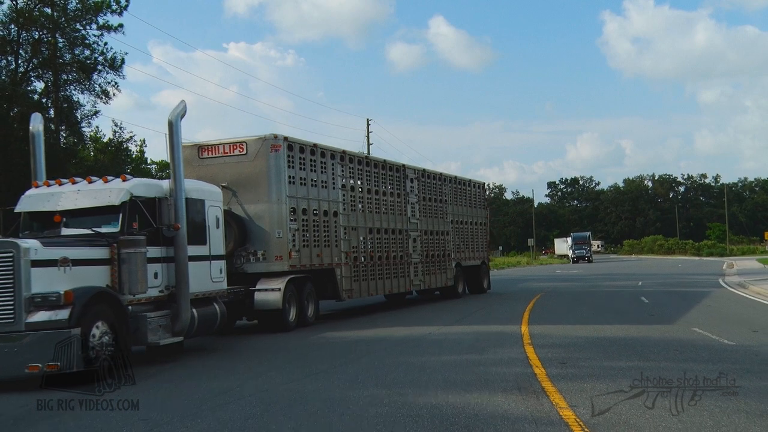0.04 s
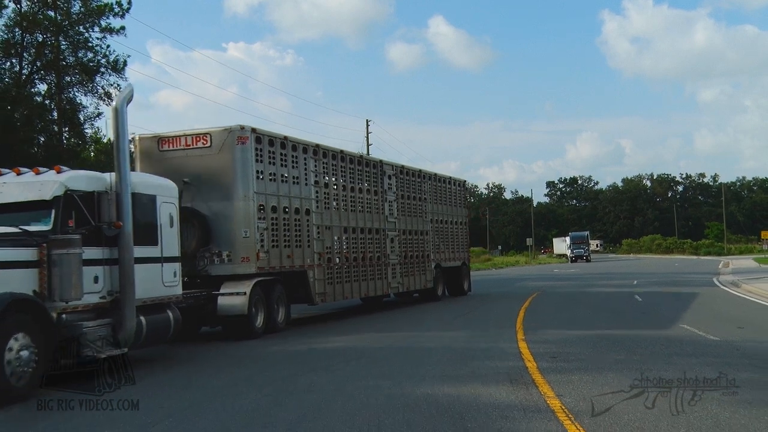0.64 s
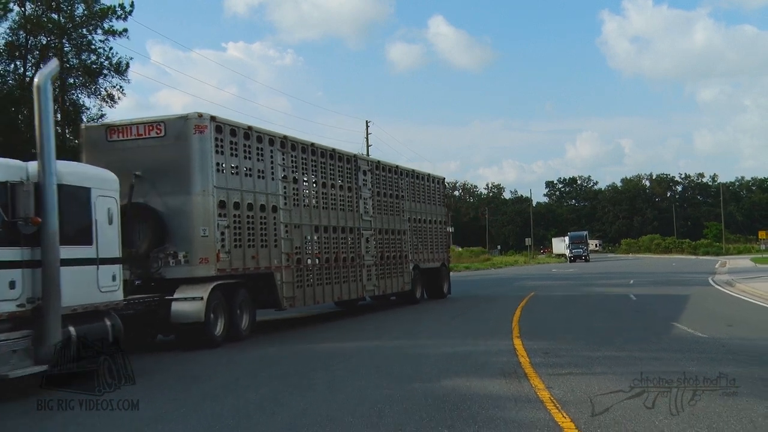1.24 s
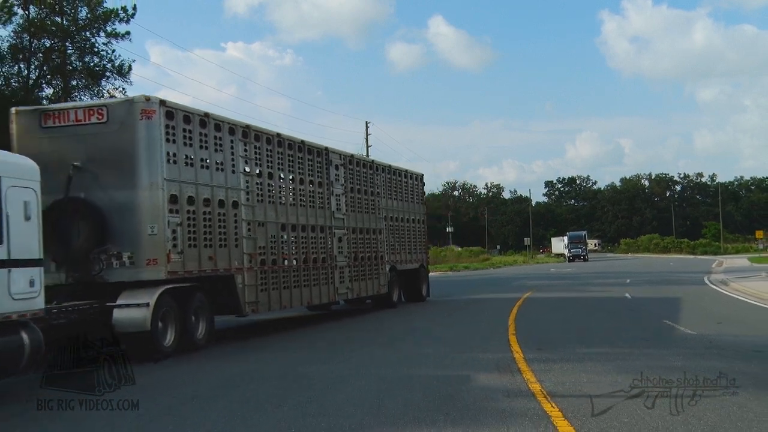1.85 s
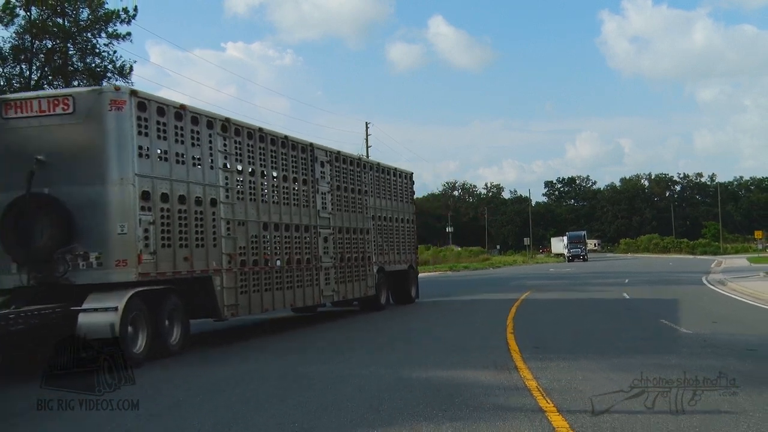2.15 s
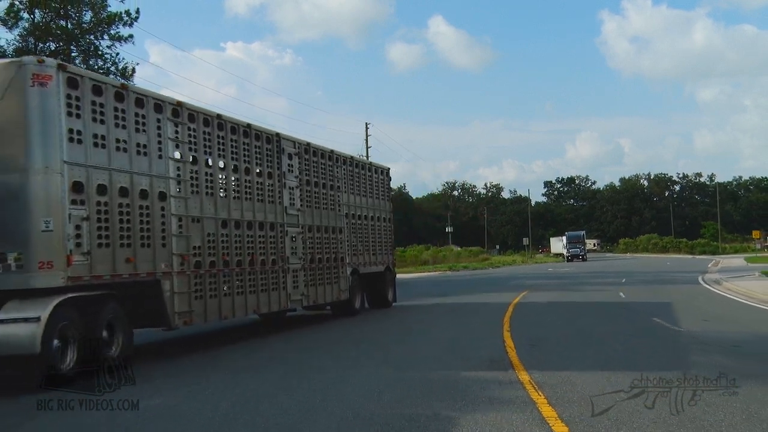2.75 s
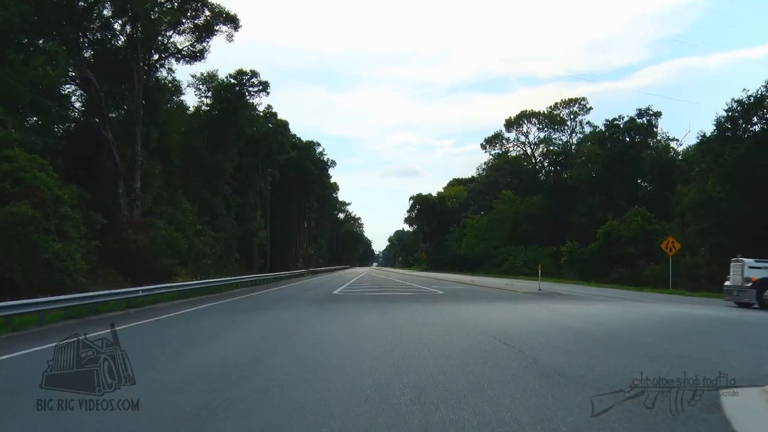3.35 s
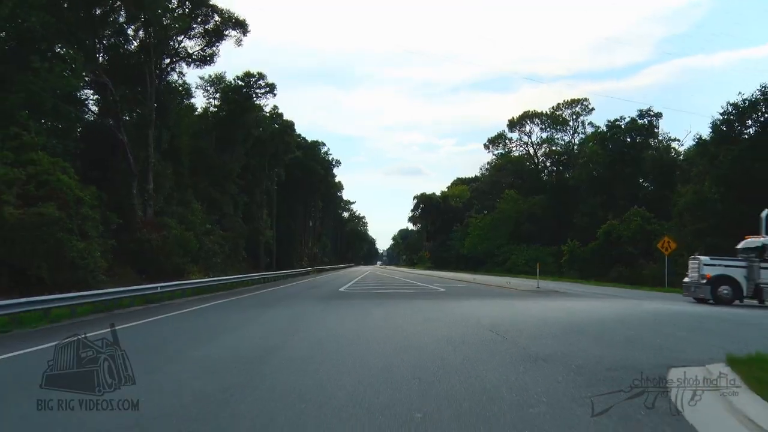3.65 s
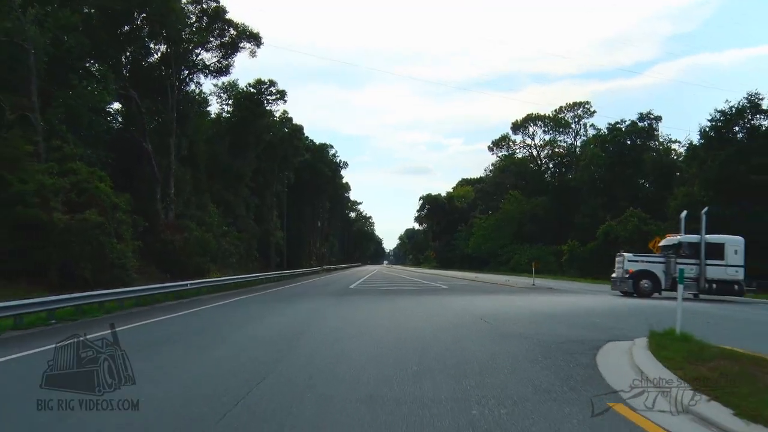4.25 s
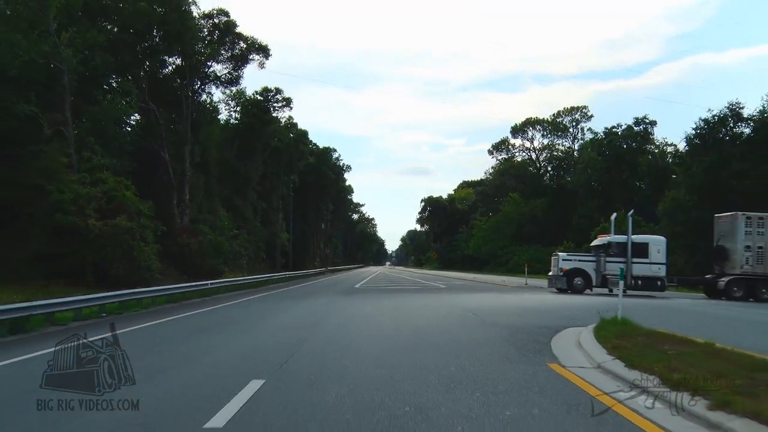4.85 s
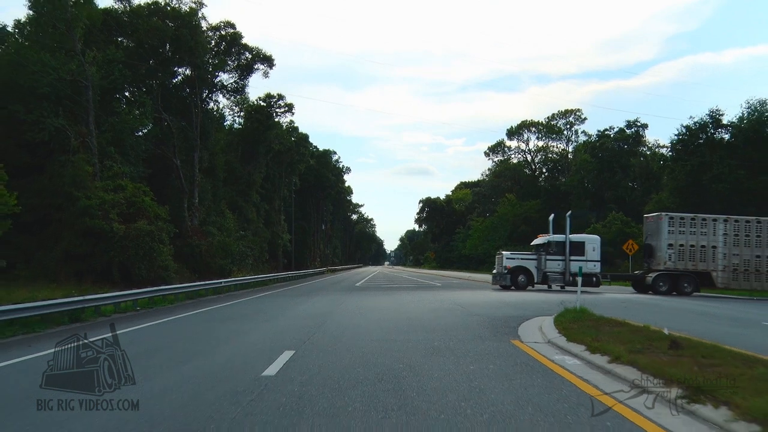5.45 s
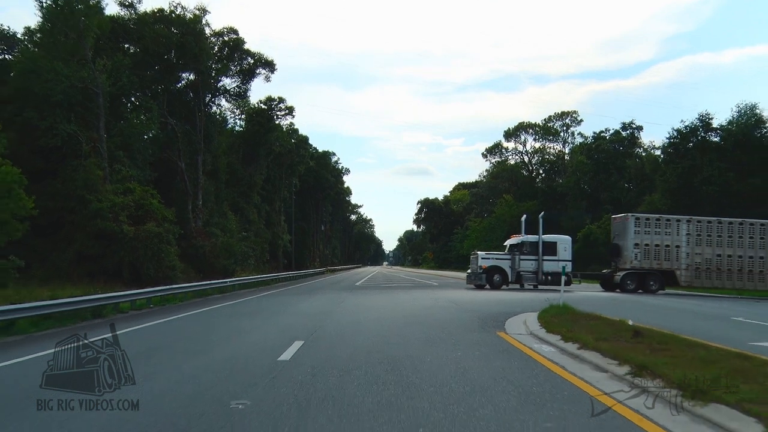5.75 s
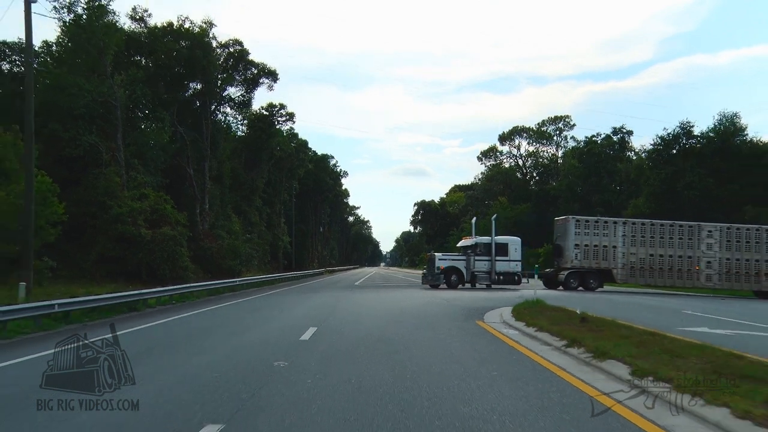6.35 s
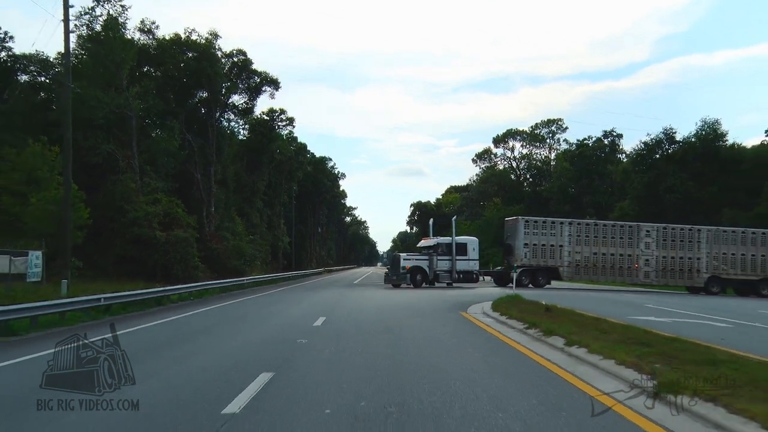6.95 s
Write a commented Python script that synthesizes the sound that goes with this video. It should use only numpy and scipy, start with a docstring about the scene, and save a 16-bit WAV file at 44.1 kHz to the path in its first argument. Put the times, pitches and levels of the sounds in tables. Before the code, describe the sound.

Close beside a road, a big diesel rig rolls by at walking pace, its exhaust booming, its turbo hissing and its belt chirping above a low rumble. Several hollow knocks pass with it. Then the truck is heard from a distance, quieter, turning onto a highway with slowly rising revs. Another diesel revs up, and faint brake squeals and short puffs of air sound over the continuing drone.

```python
"""A six-cylinder diesel truck pulls a livestock trailer past at walking pace: its firings roar and
clatter, the stacks boom, the turbo hisses and the belt chirps over a deep drone. Near 3 s dull knocks
pass with the cab. Around 4 s the scene dissolves to the same truck farther off, turning onto a highway.
A second engine revs up; then come thin brake squeals and short puffs of brake air,
while the truck slowly gains revs."""
import sys
import numpy as np
from scipy.fft import rfft, irfft, next_fast_len
from scipy.io import wavfile
from scipy.ndimage import uniform_filter1d, map_coordinates

SR = 44100
rng = np.random.default_rng(int(sys.argv[2]) if len(sys.argv) > 2 else 0)


def dump(signal):
    """Clip the signal to [-1, 1] and save it as 16-bit WAV at the path in sys.argv[1]."""
    limited = np.clip(np.atleast_2d(signal).T, -1, 1)
    pcm = np.round(limited * 32767).astype(np.int16)
    wavfile.write(sys.argv[1], SR, pcm)


N = 317520
TIME = np.arange(N) / SR
DISSOLVE_S = (3.696, 4.24)  # the close pass fades into the distant view


def amp(db):
    """Amplitude ratio of a level in decibels."""
    return 10 ** (np.asarray(db) / 20)


def unit(x):
    """Normalisation to rms 1."""
    return x / np.sqrt(np.mean(x ** 2) + 1e-20)


def along(points, hz):
    """Gain interpolated between (f/Hz, level/dB) points on a logarithmic frequency axis."""
    f, db = np.transpose(points)
    return amp(np.interp(np.log(hz + 1), np.log(f + 1), db))


def curve(points):
    """Linear interpolation of (t/s, value) points at every sample."""
    return np.interp(TIME, *np.transpose(points))


def bell(offset, sigma):
    """Gaussian window, 1 at offset 0."""
    return np.exp(-(offset / sigma) ** 2 / 2)


def wobble(rate):
    """Random modulation: a smooth curve with rate knots a second."""
    return map_coordinates(rng.standard_normal(int(N * rate / SR) + 4), [TIME * rate])


def filtered(x, response):
    """Linear filtering: the spectrum of x times a frequency response."""
    size = next_fast_len(N + SR // 2)
    return irfft(rfft(x, size) * response(np.fft.rfftfreq(size, 1 / SR)), size)[:N]


def noise(spectrum):
    """Coloured noise of rms 1, shaped by (f/Hz, level/dB) points."""
    return unit(filtered(rng.standard_normal(N), lambda hz: along(spectrum, hz)))


def narrow(hz, width_hz):
    """Narrow-band noise of rms 1: one randomly excited resonance."""
    return unit(filtered(rng.standard_normal(N), lambda f: np.exp(-((f - hz) / width_hz) ** 2)))


def tone(turns):
    """Sinusoid of rms 1 with a random starting phase."""
    return np.sqrt(2) * np.sin(2 * np.pi * (turns + rng.random()))


def afar():
    """Linear crossfade: 0 beside the road, 1 in the distant view."""
    return np.interp(TIME, DISSOLVE_S, [0, 1])


def passing(loudest_s, near_db, half_power_s, far_db):
    """Spherical spreading: pressure goes as 1 / distance during the pass, then is steady from afar."""
    near = amp(near_db) / np.hypot(1, (TIME - loudest_s) / half_power_s)
    return np.hypot((1 - afar()) * near, afar() * amp(far_db))


def road_bounce(hz, delay_s=0.00108):
    """Comb filtering: the reflection off the asphalt interferes with the direct sound."""
    # strength of the reflection: f/Hz, level/dB
    asphalt = [(500, -20), (1300, -20), (2300, -18), (3300, -11), (4200, -17), (5200, -12), (7000, -15)]
    return 1 + along(asphalt, hz) * np.exp(-2j * np.pi * hz * delay_s)


def lift(hz):
    """Resonance: the decibels a harmonic gains as the revs sweep it through a mode."""
    # modes of pipes and panels: f/Hz, width/Hz, lift/dB
    modes = [(124.24, 3.1, 7.5), (177.7, 1.74, 4.5), (254.6, 7.4, 16), (380, 7.4, 3), (480, 11, 4),
             (506, 8.9, 6.5), (547, 6, 1.5)]
    return sum(db / (1 + (2 * (hz - centre) / width) ** 2) for centre, width, db in modes)


def firings(cycles, repeat, punch, uneven_db, fade):
    """Pulse-modulated noise: one burst a firing, decaying over fade firing intervals."""
    pattern = rng.standard_normal(4410)
    periodic = unit(map_coordinates(pattern, [cycles % 1 * len(pattern)], mode="grid-wrap"))
    grit = np.sqrt(repeat) * periodic + np.sqrt(1 - repeat) * rng.standard_normal(N)
    imbalance = np.array([1, -1, .5, -1, 1, -.5])  # of the six cylinders
    number, age = np.divmod(cycles * 6, 1)
    strength = amp(uneven_db * imbalance[number.astype(int) % 6])
    return unit(grit * (1 + punch * strength * np.exp(-age / fade)))


def radiated(x, lo_hz, hi_hz):
    """Directivity: a band of engine noise changes colour with the side the truck shows."""
    # ringing engine covers: f/Hz, width/Hz, level/dB re the broad noise
    cover_modes = [(556, 130, -23), (1910, 140, -11.5), (3670, 446, -4), (4550, 320, -8), (5300, 500, -15),
                   (6217, 320, -8), (7560, 2300, -4)]
    # engine spectrum from each side and from afar: f/Hz, level/dB
    front_db = [(120, -33), (200, 2), (253, -7), (320, 2), (435, -4), (485, -6.5), (530, -6), (1220, -15.5),
                (1630, -9), (1880, -11), (2210, -13), (3010, -22.5), (3600, -26), (6190, -35.5),
                (15000, -59.5)]
    flank_db = [(120, -24), (200, 0), (231, -12.5), (298, -3), (383, -5), (412, -3), (602, -2),
                (1490, -25.5), (1910, -18.5), (2510, -24.5), (3290, -26), (4160, -36), (5450, -30.5),
                (6900, -43.5), (15000, -61)]
    rear_db = [(120, -35), (200, -2), (211, -13), (235, -1), (430, -1), (521, -5), (708, -7.5), (789, -9.5),
               (864, -11), (1660, -16.5), (1750, -19.5), (1880, -18), (2600, -26), (6190, -28), (6900, -36),
               (15000, -50.5)]
    far_db = [(120, -21), (200, 0.5), (250, -5.5), (350, -3), (430, -7.5), (500, -11), (620, -13),
              (900, -12), (1250, -16.5), (1400, -14), (1510, -17.5), (1630, -15), (2000, -15.5),
              (2600, -21.5), (3300, -29), (3700, -33.5), (4100, -39), (6300, -48.5), (8000, -59),
              (15000, -77)]
    # when each of the views below is heard alone: t/s
    facing = [.7, 2.35, 3.45, 3.95, 4.15, 5.8]
    band = lambda hz: 1 / np.sqrt((1 + (lo_hz / (hz + 1)) ** 12) * (1 + (hz / hi_hz) ** 12))
    covers = lambda hz: 1 + sum(amp(db) / (1 + (2 * (hz - f) / w) ** 2) for f, w, db in cover_modes)
    x = filtered(x, lambda hz: band(hz) * covers(hz))
    sides = (front_db, flank_db, rear_db, far_db)
    front, flank, rear, far = [unit(filtered(x, lambda hz: along(side, hz))) for side in sides]
    views = [front, flank, rear, rear, far, unit(filtered(far, road_bounce))]
    return sum(view * np.interp(TIME, facing, share) for view, share in zip(views, np.eye(len(views))))


def roar(cycles, speed, effort_db=0.2):
    """Combustion noise with engine harmonics, louder by effort_db per cycle/s gained in a second."""
    # lines of uneven cylinders and gears: order, approaching level/dB, receding level/dB (re the noise)
    side_orders = [(7, -38, -6), (8, -20, -10.5), (9, -17, -19), (11, -30, -18), (13, -11, -11.5),
                   (14, -9, -15), (15, -13.5, -7), (20, -13, -23.5), (21, -10, -31), (30, -20.5, -28),
                   (32, -26, -24.5), (36, -20, -21), (48, -15.5, -20.5), (60, -19.5, -22.5)]
    effort = np.maximum(uniform_filter1d(np.gradient(speed) * SR, size=SR // 3), 0)
    combustion = radiated(firings(cycles, repeat=0.41, punch=0.38, uneven_db=-2.5, fade=0.63), 200, 818)
    away = np.interp(TIME, [1.6, 3], [0, 1])
    lines = np.zeros(N)
    for order, ahead, behind in side_orders:
        db = ahead + (behind - ahead) * away + lift(order * speed) + 0.7 * wobble(1.94)
        lines += amp(db) * tone(order * cycles)
    gain = passing(loudest_s=3.5, near_db=-19.5, half_power_s=2, far_db=-32.5)
    return gain * amp(effort_db * effort) * (combustion + lines)


def clatter(cycles, turn_away_s=6.5, loss_db_per_s=2.5):
    """Impact noise of injectors and valves, fading as the distant truck turns its grille away."""
    impacts = radiated(firings(cycles, repeat=0.424, punch=0.305, uneven_db=3.5, fade=0.098), 880, 3420)
    turned = amp(-loss_db_per_s * np.maximum(TIME - turn_away_s, 0))
    gain = passing(loudest_s=3.5, near_db=-27.5, half_power_s=2, far_db=-41.5)
    return gain * turned * (impacts + belt_rasp(cycles))


def belt_rasp(cycles, overtone_db=-14, pulse_db=2.5):
    """Forced vibration: the slipping belt rasps in two narrow bands, hardest once a cycle."""
    ring = narrow(hz=1903, width_hz=140) + amp(overtone_db) * narrow(hz=3650, width_hz=210)
    pulse = amp(pulse_db * (tone(cycles) + tone(2 * cycles)))
    gain = passing(loudest_s=1.16, near_db=-11, half_power_s=1.1, far_db=-12.5)  # re the clatter
    return gain * unit(pulse * ring)


def turbo(cycles):
    """Flow noise: the turbo's air hisses, pulsing with the firings and surging once a cycle."""
    # change of the hiss as the truck turns: t/s, level/dB
    treble = [(0, 0), (2.4, -0.5), (2.85, -1), (3.6, 0.5), (3.85, -1.5), (4.15, 2.5), (4.8, 1.5),
              (5.45, -1.5), (6.1, 0.5), (7.1, -1.5)]
    air = radiated(firings(cycles, repeat=.1, punch=.35, uneven_db=4, fade=.3), 4000, 16000)
    swish_db = 0.5 * tone(cycles) + 0.77 * wobble(25.08)
    gain = passing(loudest_s=3, near_db=-41.5, half_power_s=1.06, far_db=-55.5)
    return gain * amp(swish_db + curve(treble)) * air


def exhaust(cycles, speed):
    """Superposition: three harmonics of the stacks crest together as each cylinder blows down."""
    # exhaust lines: order, loudest t/s, near level/dB, time to half power/s, far level/dB
    stacks = [(6, 2.94, -22, 1.35, -37.5), (12, 3.6, -15.5, 0.87, -32), (18, 3.28, -20.5, 0.7, -34.5)]
    crest = cycles - 1 / 36
    out = np.zeros(N)
    for order, *path in stacks:
        gain = passing(*path) * amp(lift(order * speed) + 1.2 * wobble(14))
        out += gain * np.sqrt(2) * np.cos(2 * np.pi * order * crest)
    return out


def whines(cycles, speed):
    """Engine orders: single harmonics climb with the revs and swell in each resonance."""
    # whining lines: order, loudest t/s, near level/dB, time to half power/s, far level/dB
    lines = [(9, 0.37, -26.5, 0.32, -61), (24, 6.2, -35, 1.4, -49), (42, 1.85, -29, 0.6, -58),
             (50, 2.5, -35.5, 0.18, -56), (51, 2.93, -31.5, 0.23, -61), (54, 0.6, -32, 0.4, -60),
             (54, 2.05, -36, 0.2, -64), (78, 3.6, -37, 0.5, -57.5), (96, 1.8, -39, 0.2, -68),
             (96, 3.6, -35.5, 0.5, -66), (100, 3.4, -38, 0.21, -75), (116, 1.32, -44, 0.08, -75),
             (160, 3.75, -38.5, 0.35, -56)]
    out = np.zeros(N)
    for order, *path in lines:
        gain = passing(*path) * amp(lift(order * speed) + 1.8 * wobble(13))
        out += gain * tone(order * cycles + 0.03 * wobble(35))
    return out


def drone(near_hz=44.6, far_hz=43, growth_db_per_s=1.6):
    """Amplitude and frequency modulation: a deep tone wavers, and grows in the distant view."""
    hz = near_hz + (far_hz - near_hz) * afar() + 0.96 * wobble(6.3)
    growth = amp(growth_db_per_s * np.maximum(TIME - DISSOLVE_S[1], 0))
    gain = passing(loudest_s=5.5, near_db=-20, half_power_s=5, far_db=-27)
    return gain * growth * amp(1.3 * wobble(4.9)) * tone(np.cumsum(hz) / SR)


def rumble(near_db=-25.5, far_db=-26):
    """Incoherent addition: two low noises, near and far, crossfade in power."""
    # rumble spectra: f/Hz, level/dB
    near_spectrum = [(15, -17), (28, -13), (42, 10.5), (70, 1), (92, -7.5), (135, -7), (165, -8), (200, -6),
                     (260, -12.5), (400, -33), (800, -120)]
    far_spectrum = [(12, -26), (22, -7), (31, -5), (39, 7), (48, -5.5), (72, -10.5), (98, -15), (145, -20),
                    (172, -23), (200, -13.5), (260, -21), (400, -45), (800, -120)]
    near = np.sqrt(1 - afar()) * amp(near_db) * noise(near_spectrum)
    return near + np.sqrt(afar()) * amp(far_db) * noise(far_spectrum)


def belt(sigma_s=.008, sag_hz_per_s=300, rough_turns=.1):
    """Friction under load: slick spots on the belt chirp in short, rough notes that sag a little."""
    # chirps: t/s, f/Hz, peak level/dB
    chirps = [(.045, 1870, -27), (.146, 1862, -26), (.26, 1858, -22), (0.37, 1865, -23.5),
              (.487, 1880, -24.5), (0.596, 1860, -20.5), (.7, 1865, -20), (.809, 1880, -21),
              (.86, 3660, -40), (.912, 1865, -23.5), (.965, 3700, -43), (1.014, 1905, -25.5),
              (1.117, 1920, -32), (1.223, 1890, -30), (1.395, 1865, -31), (1.689, 1900, -31),
              (1.815, 1900, -35), (1.95, 1870, -26.5), (2.052, 1870, -28), (2.139, 1860, -24),
              (2.365, 1890, -28), (2.45, 1880, -24.5), (2.572, 1870, -31), (3.251, 1870, -33),
              (3.36, 1870, -31), (3.531, 1875, -27), (3.627, 1870, -26.5), (4.118, 1960, -36),
              (4.171, 1930, -38), (4.216, 1960, -38), (4.32, 1960, -39), (4.369, 1940, -39),
              (4.906, 1950, -39), (4.96, 1950, -40), (5.053, 1910, -38), (5.23, 1900, -38),
              (5.336, 1930, -45), (5.534, 1910, -40), (5.636, 1900, -38), (5.914, 1850, -37),
              (6.012, 1900, -42), (6.209, 1890, -39), (6.403, 1870, -38), (6.562, 1920, -39),
              (6.7, 1925, -41)]
    out, slip = np.zeros(N), rough_turns * wobble(420)
    for s, hz, db in chirps:
        during = np.abs(TIME - s) < 5 * sigma_s
        offset = TIME[during] - s
        turns = np.cumsum(hz - sag_hz_per_s * offset) / SR + slip[during] + rng.random()
        out[during] += amp(db) * bell(offset, sigma_s) * np.sin(2 * np.pi * turns)
    return out


def whirrs():
    """Directional radiation: whirrs swell and fade as the truck turns its ringing parts outward."""
    # hollow to metallic swells: loudest t/s, sigma/s, level/dB, f/Hz, width/Hz
    swells = [(.33, .14, -54, 6150, 130), (.75, .14, -33, 505, 30), (2.12, .12, -29, 570, 45),
              (2.92, .2, -27, 520, 35), (3.36, .15, -33, 1250, 300), (3.5, .22, -37, 1870, 40),
              (4.25, .11, -37, 490, 25), (4.62, .1, -41, 490, 20), (5.5, .12, -39, 345, 18),
              (6.03, .3, -43, 1750, 230), (6.78, .07, -37, 383, 16)]
    return sum(amp(db) * bell(TIME - s, sigma) * narrow(hz, width) for s, sigma, db, hz, width in swells)


def knocks(attack_s=0.00093, thud_t60_s=0.025):
    """Damped oscillation: as the cab rolls by, each knock is a short thud and one hollow ring."""
    # knocks: t/s, level/dB, f/Hz, t60/s, thud level/dB re the ring
    hits = [(2.697, -13.5, 518, 0.15, -7), (2.872, -9, 523, 0.11, -12), (2.899, -14, 517, 0.09, -7),
            (3.001, -7, 550, 0.072, -3.5), (3.195, -11.5, 542, 0.092, -13), (3.387, -10.5, 526, 0.085, -7)]
    # thud spectrum: f/Hz, level/dB
    thud_spectrum = [(80, -25), (300, -1), (800, 1), (1600, -13), (5000, -48)]
    out, dull_noise = np.zeros(N), noise(thud_spectrum)
    for s, db, hz, t60, thud_db in hits:
        during = (TIME >= s) & (TIME < s + t60)
        age = TIME[during] - s
        ring = amp(-60 * age / t60) * np.sin(2 * np.pi * hz * age)
        thud = amp(thud_db - 60 * age / thud_t60_s) * dull_noise[during]
        out[during] += amp(db) * (1 - np.exp(-age / attack_s)) * (ring + thud)
    return out


def growl(cycles, level_db=-40, centre_hz=393, sigma_hz=110):
    """Roughness: from afar, the uneven firings modulate a band in the lower middle range."""
    bursts = firings(cycles, repeat=.35, punch=3, uneven_db=4, fade=.25)
    return afar() * amp(level_db) * unit(filtered(bursts, lambda hz: bell(hz - centre_hz, sigma_hz)))


def second_engine(idle_hz=8.45, top_hz=9.72, idle_db=-30.5, top_db=-20, mid_rise_s=4.62, rise_s=0.3555):
    """Harmonic series: another distant diesel's low lines rise and grow with its cycle rate."""
    # engine lines: order, relative level/dB
    lines = [(4, -10.5), (6, 0), (8, -16.5), (14, -18), (15, -22), (16, -10), (17, -26), (30, -25.5),
             (32, -35)]
    revved = (1 + np.tanh((TIME - mid_rise_s) / rise_s / 2)) / 2
    cycles = np.cumsum(idle_hz + (top_hz - idle_hz) * revved) / SR
    gain = afar() * amp(idle_db + (top_db - idle_db) * revved)
    return gain * sum(amp(db + 1.64 * wobble(5.8)) * tone(order * cycles) for order, db in lines)


def brake_squeals():
    """Friction-excited vibration: the shoes sing briefly on their drums."""
    # squeals: start t/s, end t/s, start f/Hz, end f/Hz, level/dB
    squeals = [(4.86, 4.94, 7010, 6960, -66), (4.96, 5.11, 6950, 6910, -66),
               (6.99, 7.14, 6350, 6690, -63.5), (7.12, 7.22, 7200, 7260, -68)]
    out = np.zeros(N)
    for start, end, start_hz, end_hz, db in squeals:
        progress = np.clip((TIME - start) / (end - start), 0, 1)
        hz = start_hz + (end_hz - start_hz) * progress + 15 * wobble(50) + 60 * wobble(1500)
        arch = np.sqrt(np.abs(np.sin(np.pi * progress)))
        out += amp(db + 2.6 * wobble(30)) * arch * tone(np.cumsum(hz) / SR)
    return out


def brake_air():
    """Jet noise: released air escapes in soft puffs and reflects off the road."""
    # puffs: t/s, level/dB, time constant of swell and fade/s
    puffs = [(5.26, -52, 0.089), (6.1, -57, .15), (6.4, -44, 0.11)]
    # spectrum of the air: f/Hz, level/dB
    air_spectrum = [(1000, -21), (2500, 8), (3300, -8), (3800, 0), (4150, 1), (4600, 1), (5100, -4),
                    (5600, -5), (5950, -9), (6400, -5), (8500, -23), (15000, -37)]
    envelope = sum(amp(db) * np.exp(-np.abs(TIME - s) / fade) for s, db, fade in puffs)
    return envelope * filtered(noise(air_spectrum), road_bounce)


def scene():
    """Superposition of all sources; one crankshaft times the truck's firings and harmonics."""
    # rate of four-stroke cycles, six firings each (an order is a multiple of it): t/s, f/Hz
    cycle_rate = [(0.0, 8.81), (0.35, 8.84), (0.9, 9.46), (1.5, 9.83), (2.3, 10.01), (3.1, 10.08),
                  (3.9, 10.26), (4.25, 10.16), (5.4, 10.14), (6.35, 10.35), (6.8, 10.69), (7.2, 10.88)]
    speed = curve(cycle_rate)
    cycles = np.cumsum(speed * (1 + 0.000936 * wobble(12))) / SR
    engine = roar(cycles, speed) + clatter(cycles) + turbo(cycles)
    tones = exhaust(cycles, speed) + whines(cycles, speed)
    lows = drone() + rumble()
    details = belt() + whirrs() + knocks()
    distant = growl(cycles) + second_engine() + brake_squeals() + brake_air()
    return (engine + tones + lows + details + distant)[None]


def record(dry, hiss_db=-63.5, top_hz=15720):
    """Self-noise and bandwidth: the microphone adds faint white hiss, and nothing above top_hz passes."""
    hiss = amp(hiss_db) * rng.standard_normal(N)
    return filtered(dry[0] + hiss, lambda hz: hz < top_hz)[None]


dry = scene()
out = record(dry)
dump(out)
```